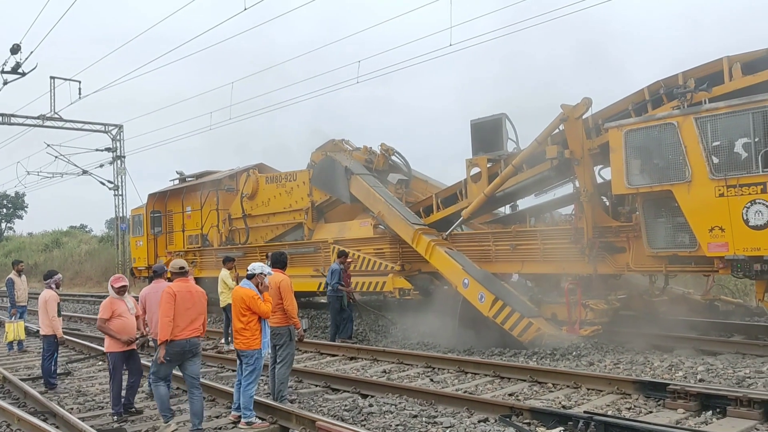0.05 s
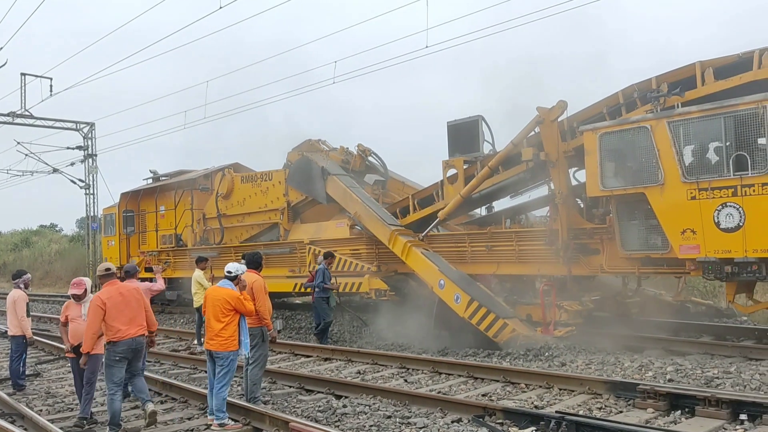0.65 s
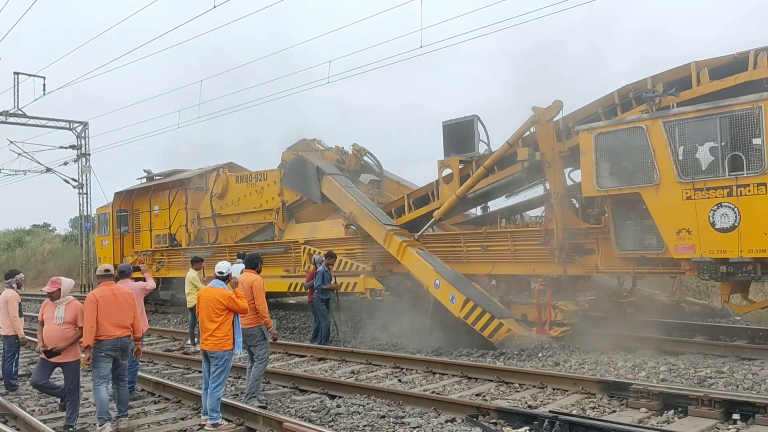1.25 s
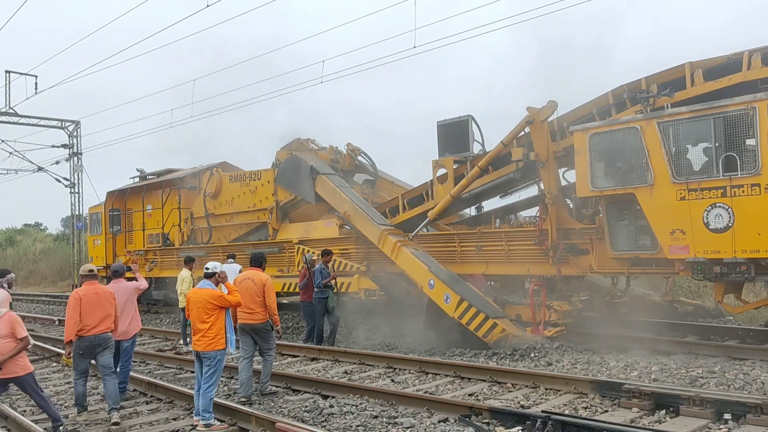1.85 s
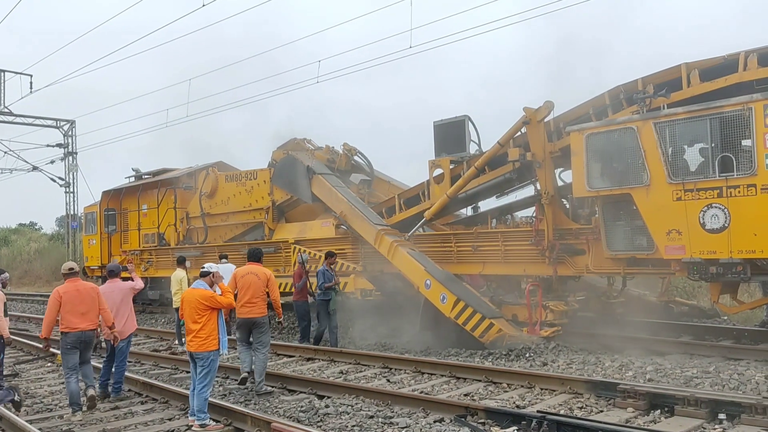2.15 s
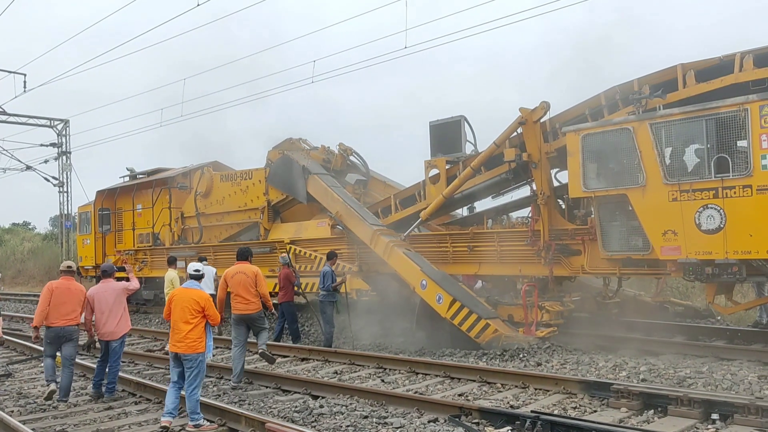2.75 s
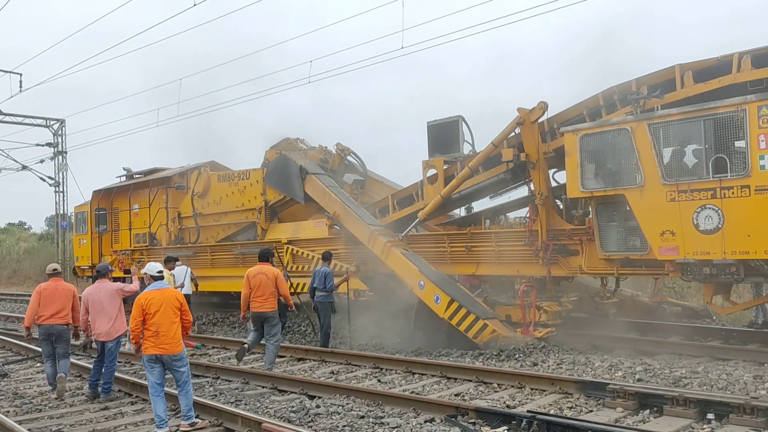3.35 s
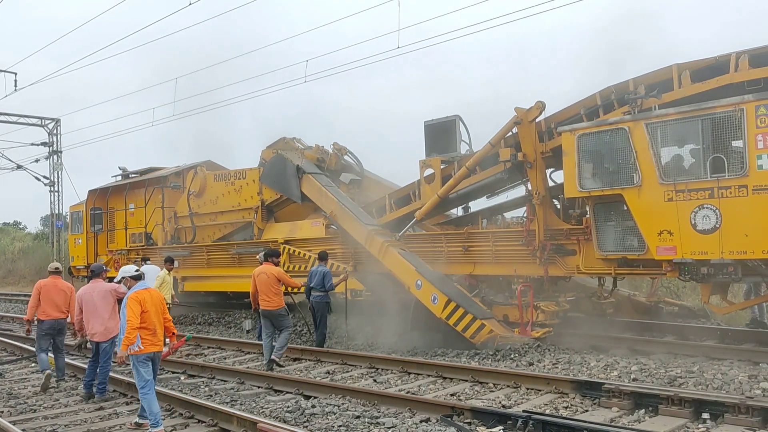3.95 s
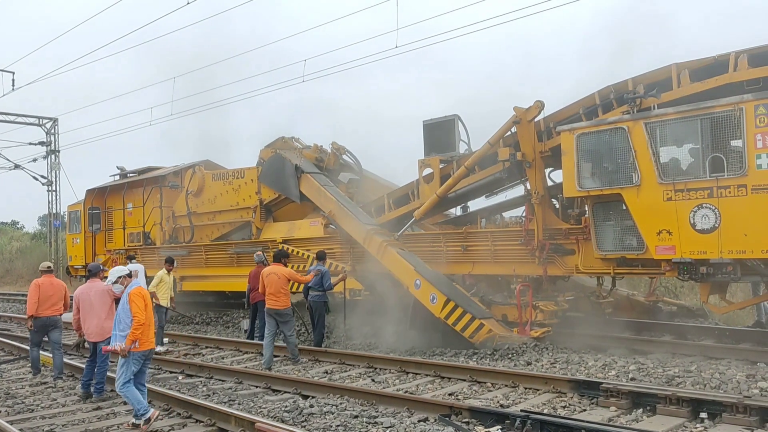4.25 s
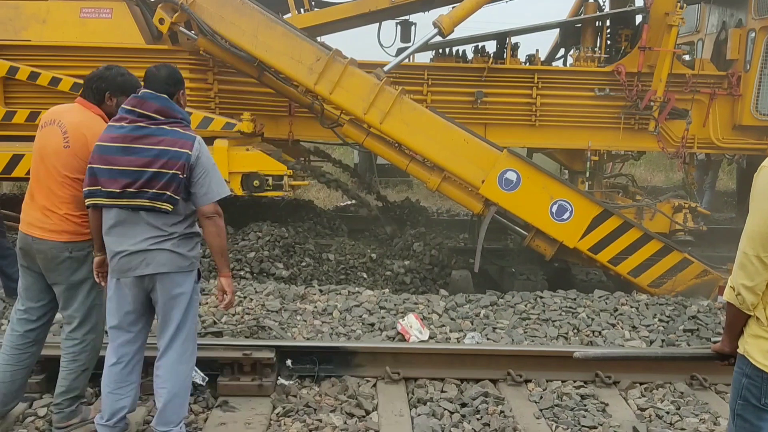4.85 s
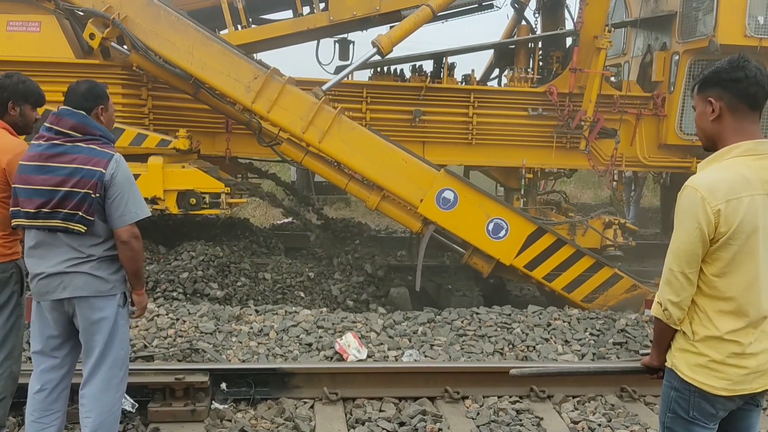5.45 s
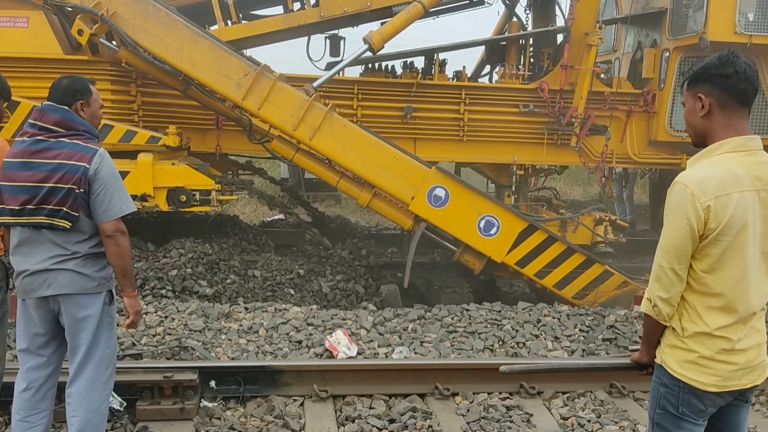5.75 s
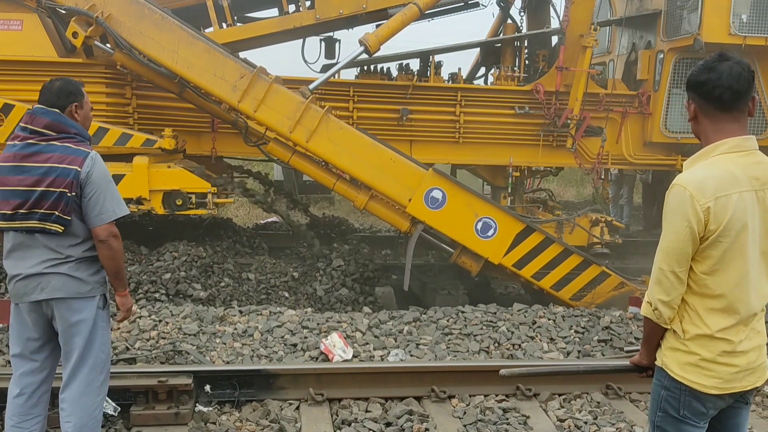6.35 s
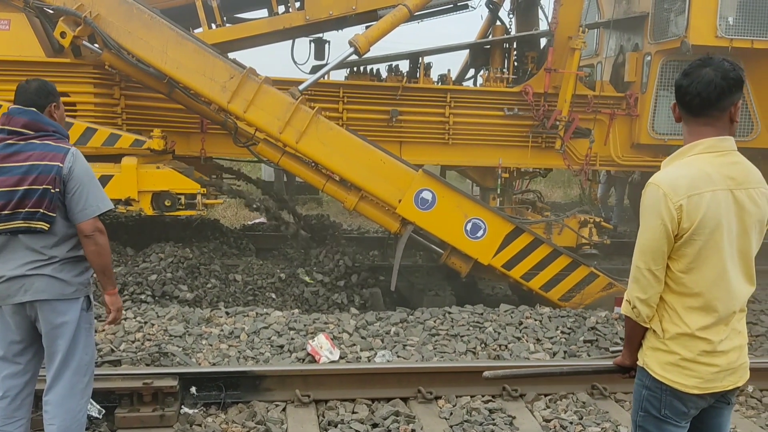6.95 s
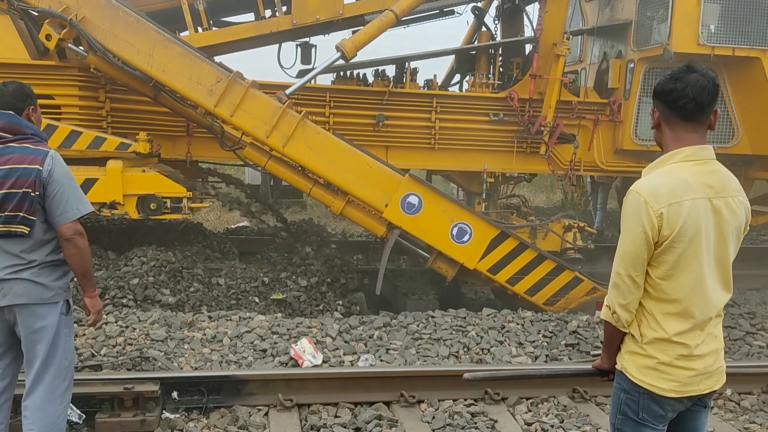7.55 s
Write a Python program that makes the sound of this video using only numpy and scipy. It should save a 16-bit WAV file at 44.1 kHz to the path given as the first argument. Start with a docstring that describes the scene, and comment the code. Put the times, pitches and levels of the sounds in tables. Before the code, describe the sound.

A track maintenance machine roars with stones rattling through steel troughs over a diesel drone, first from a distance, then close up.

```python
"""A torrent of stones rattles through the steel troughs of a ballast cleaning machine on a railway line.
Countless impacts merge into a roar, coloured by the resonances of the steel, while large stones clink,
knock and crunch. Beneath it two diesels drone and a shaking screen thumps, each in harmonics of its cycle.
The machine is heard first from across the tracks; the sound breaks off for a moment, with one tick,
and swells back with a soft thud from close beside the digging chain."""
import sys
import numpy as np
from scipy import signal
from scipy.fft import rfft, irfft
from scipy.io import wavfile
from scipy.ndimage import uniform_filter1d

SR = 44100
rng = np.random.default_rng(int(sys.argv[2]) if len(sys.argv) > 2 else 0)


def inscribe(sig):
    """Save sig as 16-bit PCM at rate SR to the path in sys.argv[1].

    A 1-D sig is mono; a 2-D sig holds one channel per row.
    Samples are clipped to [-1, 1] before scaling.
    """
    pcm = np.round(np.clip(np.atleast_2d(sig).T, -1, 1) * 32767)
    wavfile.write(sys.argv[1], SR, pcm.astype(np.int16))


N = 340011
TIME = np.arange(N) / SR

# Spectrum of stones on steel: (frequency [Hz], left density [dB/Hz], right density [dB/Hz])
FAR_SPECTRUM = [(26, -71, -80), (42, -51.5, -67.5), (55, -52.5, -63), (124, -52.5, -56), (165, -48, -52.5),
                (225, -47, -50), (280, -42.5, -50), (330, -44.5, -52), (387, -47.5, -46.5), (530, -50, -55),
                (780, -48.5, -48), (937, -50.5, -54.5), (1630, -52.5, -54), (1840, -51, -53.5),
                (2200, -55.5, -54.5), (2400, -52.5, -53.5), (3370, -54, -57.5), (5530, -56.5, -56),
                (14400, -64.5, -64)]
NEAR_SPECTRUM = [(26, -63, -72), (40, -44, -62), (55, -46, -61), (119, -49, -56.5), (233, -43, -45),
                 (318, -42.5, -50.5), (400, -47.5, -49), (550, -49, -51.5), (650, -48.5, -48),
                 (764, -45, -47.5), (990, -48, -51), (1680, -50.5, -51.5), (1930, -51, -51.5),
                 (3230, -56.5, -55.5), (5630, -57, -59.5), (14000, -59.5, -54.5)]
# Likeness of the two channels: (frequency [Hz], coherence [0-1], phase lead of the left [rad])
FAR_COHERENCE = [(100, .96, -.1), (300, .94, -.35), (520, .8, -.1), (750, .88, .2), (1000, .62, 0),
                 (1250, .7, .1), (1600, .36, .1), (1900, .45, .3), (2800, .36, 1.9), (4400, .3, 1.1),
                 (6000, .08, 3)]
NEAR_COHERENCE = [(100, .95, 0), (330, .92, 0), (580, .76, .1), (950, .54, 1.2), (1500, .42, 2.3),
                  (2100, .25, 4.1), (3200, .1, 6), (4500, .2, 7.5), (5700, .32, 12), (7000, .25, 12.6),
                  (9000, .12, 15.5)]
# Resonance of the microphone ports: (frequency [Hz], left gain [dB], right gain [dB])
PORT_RESPONSE = [(5500, 0, 0.5), (6260, -0.5, 1.5), (7300, 6.5, 9), (8430, -2.5, 5), (8650, 3.5, -5),
                 (8980, 3, -18), (9470, 1.5, -15), (10180, -27, -1), (11200, -7, -10),
                 (14000, -10.5, -14.5)]
def ballast_roar(spectrum, modes, coherence, flow, cracks, rings,
                 crack_share, ring_share, clump_db, level_db):
    """Source and filter: single stones stand out of the noise of thousands, and the steel colours both."""
    drive = np.sqrt(crack_share) * cracks + np.sqrt(1 - crack_share) * rng.standard_normal((2, N))
    frames = dict(fs=SR, nperseg=1024, noverlap=768)
    hz, t, wash = signal.stft(drive, **frames)
    ringing = signal.stft(rings, **frames)[2]
    ring_band = np.interp(hz, [500, 1100, 9000, 9900], [0, 1, 1, 0])[:, None]
    left, other = np.sqrt(1 - ring_share * ring_band) * wash + np.sqrt(ring_share) * ringing
    alike, lead = over_hz(coherence, hz)[:, :, None]
    right = (alike * left + np.sqrt(1 - alike ** 2) * other) * np.exp(-1j * lead)
    # boom, clatter and spray each surge in their own range
    weights = ([.91, .5, .016, .15], [.33, .66, .52, .45], [.071, 0, .44, .57])
    ranges = np.array([np.interp(hz, [350, 503, 1600, 2600], w) for w in weights])
    swell = ranges.T @ np.array([np.interp(t, TIME, level) for level in flow])
    # each clump of stones has its own pitch, and the top treble flickers
    clump_depth = clump_db * np.interp(hz, [300, 1200, 8000, 10500], [.35, .9, .7, 6])
    clumps = flicker(clump_depth, left.shape, bins=6, frames=5)
    # narrow bands flicker, which makes the rattle coarse
    coarse_depth = 2.1 * np.interp(hz, [500, 1500, 6000, 8000], [0, 1, 1, .5])
    coarse = flicker(coarse_depth, left.shape, bins=2, frames=9)
    colour = over_hz(spectrum, hz) + over_hz(PORT_RESPONSE, hz)
    gain_db = colour[:, :, None] + trough_resonance(modes, hz, t) + swell + clumps + coarse + level_db
    roar = signal.istft(np.array([left, right]) * amp(gain_db), **frames)[1]
    return np.sqrt(SR / 2) * roar[:, :N]


def stone_cracks(per_s, spread_db, t60_s, octaves=.55, sizes=18):
    """Shot noise of collisions: each size of stone cracks in its own band, and big ones ring longer."""
    t = np.arange(2048) / SR
    f = np.fft.rfftfreq(len(t), 1 / SR)
    centres = np.geomspace(500, 11000, sizes)
    bands = octave_bell(f, centres[:, None], octaves) + 1e-6
    bands /= np.sqrt((bands ** 2).sum(0))
    out = np.zeros((2, N))
    for hz, band in zip(centres, bands):
        strength = amp(spread_db * np.minimum(rng.exponential(1, N), 4))
        hits = unit(strength * impulses(per_s / sizes, N))
        decay = amp(-60 * t / (t60_s * np.sqrt(2000 / hz)))  # t60_s holds at 2 kHz
        crack = irfft(rfft(rng.standard_normal((2, len(t)))) * band) * decay
        crack *= np.sqrt(np.mean(band ** 2)) / np.linalg.norm(crack, axis=1, keepdims=True)
        out += signal.oaconvolve(hits[None], crack, axes=1)[:, :N]
    return out


def pebble_rings(per_s=900, spread_db=1.2, nominal_t60_s=.06, span_hz=9000):
    """Damped free vibration: each hard stone rings at its own pitch, with a phase for each channel."""
    t = np.arange(3072) / SR
    out = np.zeros((2, N + len(t)))
    for when, pitch, size, sustain, left, right in rng.random((int(per_s * TIME[-1]), 6)):
        hz = 450 + span_hz * pitch ** 1.5
        weight = amp(spread_db * min(-np.log(1 - size), 2)) * pitch ** .25
        t60 = nominal_t60_s * (.5 + sustain) * (2000 / hz) ** .3
        decay = amp(-60 * t / t60) / np.sqrt(t60)
        phase = 2 * np.pi * (hz * t + np.array([[left], [right]]))
        start = int(when * N)
        out[:, start:start + len(t)] += weight * decay * np.sin(phase)
    return unit(out[:, :N]) * np.sqrt(span_hz / (SR / 2))


# Resonances of the steel troughs and chutes: (frequency [Hz], bandwidth [Hz], mean peak gain [dB])
FAR_TROUGH_MODES = [(734, 120, 1.2), (1160, 260, 3.8), (1915, 200, 3.8), (2430, 280, 2.8), (3020, 220, 3.5),
                    (3580, 160, 2), (4230, 220, 3)]
NEAR_TROUGH_MODES = [(860, 42, 3.6), (1085, 110, 2.6), (1280, 60, 2), (1460, 100, 1.5), (1980, 270, 2.7),
                     (2730, 200, 2.3), (4690, 170, 3.5), (6230, 320, 4.2)]
def trough_resonance(modes, hz, t, shifts_per_s=12):
    """Lorentzian resonances, in dB: each shifts in pitch and strength as stones land in other places."""
    gain = np.zeros((len(hz), len(t)))
    for centre, width, db in modes:
        shift, strength = (np.interp(t, TIME, wander(shifts_per_s)) for _ in range(2))
        detune = hz[:, None] - centre - .4 * width * shift
        gain += db * (1 + .35 * strength) / (1 + (2 * detune / width) ** 2)
    return gain


# The chain tips a load or runs nearly empty: (time [s], duration [s], clatter [dB], spray [dB])
CHAIN_LOADS = [(.25, .1, -2, 0.5), (0.635, 0.1, -1, 2.5), (1.17, 0.24, 1, 0), (1.62, 0.14, -2.5, 1.5),
               (1.84, 0.17, 1, -0.5), (2.06, .05, 0.5, 3), (2.2, 0.4, -2, -0.5), (2.545, 0.11, -3, 1),
               (2.745, 0.058, -1, 0), (2.907, .04, -1.5, 0), (2.967, 0.054, 3, 1.5), (3.07, 0.12, -4.5, 0),
               (3.42, 0.1, -3, -0.2), (3.538, .08, 0, 0), (3.692, 0.081, 2, -5.5), (4.23, 0.076, 2.5, -3),
               (4.407, 0.075, -2.5, -1.5), (4.578, 0.051, 4.5, -4.5), (5.208, 0.065, 1.5, -4),
               (5.74, 0.057, 0, -2.5), (5.92, 0.13, -0.5, 1.5), (6.404, 0.42, -0.5, -1),
               (7.134, 0.17, 0, 2.2)]
def stone_flow(boom_db, clatter_db, spray_db, surges_per_s=2.1):
    """Amplitude modulation: uneven flow varies the troughs' boom, the clatter and the grit spray, in dB."""
    levels = np.array([depth * wander(surges_per_s) for depth in (boom_db, clatter_db, spray_db)])
    for s, length, clatter, spray in CHAIN_LOADS:
        levels[1:] += np.outer([clatter, spray], bump(s, length))
    return levels


# Large stones clinking against steel: (time [s], frequency [Hz], relative level [dB])
STONE_CLINKS = [(0.323, 3620, -23), (0.352, 4050, -23), (0.36, 4740, -27), (0.42, 3620, -28),
                (0.425, 2150, -21), (0.481, 1810, -22.1), (0.68, 3100, -19), (0.757, 3530, -17),
                (0.84, 3620, -19), (1.058, 3190, -19), (1.15, 3360, -25.0), (1.255, 4650, -23),
                (1.264, 2410, -21), (1.521, 2840, -22.4), (1.612, 2240, -21.6), (1.767, 4570, -26.2),
                (1.796, 4650, -19), (1.878, 1810, -19), (1.879, 4570, -20), (1.918, 4050, -23.7),
                (2.059, 2670, -21), (2.261, 4500, -24), (2.399, 2760, -22.7), (2.616, 4480, -25.8),
                (2.654, 4220, -21), (2.661, 2240, -20), (3.242, 2480, -16), (3.843, 3620, -21),
                (3.886, 4220, -24.5), (3.89, 3700, -25.5), (4.308, 3450, -25), (4.311, 4570, -18),
                (4.523, 1980, -25.5), (4.562, 2500, -24), (4.58, 3360, -28), (5.554, 3790, -24),
                (5.583, 2070, -22.7), (5.786, 4390, -26.9), (6.137, 4130, -27.8), (6.694, 2070, -20),
                (6.767, 5000, -22), (7.231, 3010, -26), (7.653, 2150, -23.3)]
# Heavy stones knocking in the chain trough: (time [s], frequency [Hz], relative level [dB])
TROUGH_KNOCKS = [(0.627, 790, -18), (0.66, 790, -23), (1.105, 770, -19), (1.161, 870, -19),
                 (1.334, 830, -23), (1.492, 820, -17), (1.741, 760, -16), (1.873, 830, -16),
                 (1.992, 930, -20.2), (2.558, 860, -20), (2.853, 1070, -20.7), (2.95, 920, -20),
                 (3.939, 780, -19), (4.085, 760, -24), (4.198, 1190, -18), (4.263, 770, -21),
                 (4.352, 760, -24), (4.546, 800, -21), (4.626, 780, -20), (5.156, 830, -20.3),
                 (5.322, 970, -24), (5.412, 846, -21), (5.574, 940, -19.5), (6.166, 830, -21),
                 (6.309, 810, -18), (6.427, 720, -17), (6.555, 780, -24), (6.637, 850, -19.1),
                 (6.898, 910, -17), (6.96, 760, -22), (7.116, 770, -19)]
def stone_strikes(strikes, level_db, width_hz, rise_s, t60_s, channels):
    """Impact excitation: a stone on steel rings a cluster of close modes, width_hz wide at 3 kHz."""
    t = np.arange(4096) / SR
    f = np.fft.rfftfreq(len(t), 1 / SR)
    envelope = (1 - np.exp(-t / rise_s)) * amp(-60 * t / t60_s)
    out = np.zeros((2, N + len(t)))
    for s, hz, db in strikes:
        phases = np.exp(2j * np.pi * rng.random((channels, len(f))))
        width = width_hz * np.sqrt(hz / 3000)
        modes = phases / (1 + (2 * (f - hz) / width) ** 2)
        ring = unit(irfft(modes) * envelope) / unit(envelope).max()
        start = int(s * SR)
        out[:, start:start + len(t)] += amp(db + level_db) * ring
    return out[:, :N]


# Heaps tumbling onto steel: (time [s], decay time [s], centre frequency [Hz], level [dB])
TUMBLING_HEAPS = [(0, .014, 3200, -15), (.177, .014, 5500, -16), (.362, 0.024, 4600, -16.5),
                  (0.424, .035, 2500, -15), (0.673, 0.025, 3800, -21), (.757, 0.029, 3700, -20),
                  (.843, .02, 3700, -21), (1.048, .028, 2600, -19), (1.256, 0.033, 3000, -22),
                  (1.38, 0.038, 3700, -17), (1.539, 0.019, 3400, -13.5), (1.881, .025, 3000, -21),
                  (1.926, .02, 3000, -19), (2.105, 0.022, 2600, -16), (2.146, .02, 4500, -18),
                  (2.26, .02, 3700, -19), (2.316, .02, 2300, -17), (2.425, 0.038, 3100, -20),
                  (2.613, 0.018, 3600, -19), (2.659, .02, 3000, -18), (2.809, 0.026, 2500, -17),
                  (2.964, .025, 2700, -22), (3.134, 0.016, 4500, -20), (3.242, 0.027, 2300, -21),
                  (3.331, 0.033, 3600, -18), (3.608, .03, 5500, -19), (3.886, 0.022, 3500, -18),
                  (3.961, .02, 3300, -17), (4.219, 0.027, 3500, -18), (4.305, .045, 2600, -18),
                  (4.318, .014, 4200, -13.5), (4.525, .022, 2000, -17.5), (4.568, .034, 3000, -15),
                  (5.122, .02, 3000, -17.5), (4.654, 0.028, 4500, -18.5), (5.286, 0.023, 3400, -20),
                  (5.351, .02, 5200, -19), (5.475, .035, 3400, -23), (5.636, 0.022, 5500, -15),
                  (5.788, .025, 3200, -18.5), (6.047, 0.018, 6000, -19), (6.201, 0.018, 4000, -19),
                  (6.595, 0.022, 4300, -23), (6.672, .025, 5800, -19), (6.949, 0.018, 6000, -19),
                  (7.132, 0.021, 4700, -20), (7.207, .03, 3600, -23), (7.472, .022, 5800, -16)]
def crunches(octaves=.6, hits_per_s=750, rise_s=.003, t60_s=.017, stones=4):
    """Superposed impacts: a few stones land together and chatter in a dying volley of dry cracks."""
    t = np.arange(8192) / SR
    f = np.fft.rfftfreq(len(t), 1 / SR)
    ports = amp(over_hz(PORT_RESPONSE, f))
    out = np.zeros((2, N + len(t)))
    for s, decay_s, hz, db in TUMBLING_HEAPS:
        hits = impulses(hits_per_s / stones, (stones, len(t)))
        cracks = rng.standard_normal((2, stones, len(t))) * amp(-60 * t / t60_s)
        chatter = (rfft(hits) * rfft(cracks)).sum(1)
        volley = unit(irfft(chatter * octave_bell(f, hz, octaves) * ports))
        envelope = np.minimum(t / rise_s, 1) * np.exp(-(t / decay_s) ** 2 / 2)
        start = int(s * SR)
        out[:, start:start + len(t)] += amp(db) * volley * envelope
    return out[:, :N]


# Diesel harmonics: (order [multiple of the cycle], far relative level [dB], near relative level [dB])
DIESEL_HARMONICS = [(11, -39.5, -49), (12, -33, -35), (13, -34.5, -37), (14, -36.5, -35), (16, -35.5, -35),
                    (18, -32.5, -30.5), (19, -33.5, -34.5), (20, -35, -31.5)]
# Screen harmonics: (order [multiple of the stroke], far relative level [dB], near relative level [dB])
SCREEN_HARMONICS = [(1, -38.5, -45), (3, -40, -37.5), (4, -47, -46), (5, -42, -37)]
# Beating of the firing tone as two diesels drift in and out of step: (time [s], relative level [dB])
FIRING_BEAT = [(0, 0.5), (.5, -1.5), (.8, -17), (1.02, -7.5), (1.25, -21), (1.52, -1), (1.75, -.5),
               (2.7, 0), (3.02, -1.5), (3.3, -14.5), (4.05, -11), (4.27, -5), (4.6, -0.5), (5.2, 2),
               (5.5, -5), (6.6, -4), (6.8, 5), (7.6, 5.5)]
CYCLE_HZ, STROKE_HZ, PUMP_HZ = 17.32, 16.2, 263.8
FAR, NEAR = 0, 1
def machinery(view, flow, waver, hunting, drone_db, firing_db, pump_db, pipe_db, throb_db):
    """Periodic forcing: diesels, pump and screen radiate tones that drift together as a governor hunts."""
    drift = hunting * wander(1.14)
    boom, clatter, _ = flow
    drone = sum(amp(db[view]) * tone(order * CYCLE_HZ, drift, waver) for order, *db in DIESEL_HARMONICS)
    drone *= amp(drone_db + boom)
    drone += amp(pump_db) * tone(PUMP_HZ, drift, waver / 2)
    drone += amp(pipe_db) * tone(17 * CYCLE_HZ, drift, waver)
    thump = sum(amp(db[view]) * tone(order * STROKE_HZ, drift / 4, .38)
                for order, *db in SCREEN_HARMONICS)
    # a deep engine tone lies close to one of the screen's, and the two throb together
    thump += amp(throb_db) * tone(2.5 * CYCLE_HZ, drift / 4, .2)
    thump *= amp(clatter)
    beat_db = np.interp(TIME, *np.transpose(FIRING_BEAT))
    firing = amp(firing_db + beat_db) * tone(6 * CYCLE_HZ, drift, .048)
    return drone * amp([[1], [-1.1]]) + (thump + firing) * amp([[2.3], [-3.2]])


# Swelling drone tones: (peak time [s], duration [s], frequency [Hz], glide [Hz/s], relative level [dB])
DRONE_MOANS = [(.08, 0.53, 294, 0, -26), (.94, .28, 294.5, 0.5, -21), (3.848, .23, 293.5, -2, -24),
               (5.134, .09, 285, -120, -23), (5.207, .12, 305, 70, -27), (5.27, .11, 346, -0.5, -23),
               (5.338, .08, 236, 1, -24), (5.51, 0.058, 238, -89.5, -21), (5.74, .1, 303, 151, -21),
               (5.841, 0.084, 312, -110, -20.5), (5.912, .11, 264, -0.5, -22),
               (6.165, .16, 228.4, 30, -23.5), (6.253, .1, 297, -110, -20.5), (6.51, 0.091, 309, 29, -27),
               (6.866, 0.16, 209, 0, -23.5), (7.109, 0.061, 324, 101, -20), (7.208, .09, 231.2, -41, -21),
               (7.317, .12, 210, 40, -22), (7.52, 0.11, 310, -90, -24)]
def moans(level_db, slide):
    """Amplitude and frequency modulation: tones of the drone swell and sink, gliding as they pass."""
    drift = slide * wander(4.65)
    sound = sum(amp(db) * bump(s, length) * tone(hz, drift + glide * (TIME - s) / hz, .22)
                for s, length, hz, glide, db in DRONE_MOANS)
    return amp(level_db) * sound * amp([[1], [-1.1]])


def sliding_tone(hz, level_db):
    """Random frequency modulation: close by, a tone of the drone slides up and down and flutters."""
    return amp(level_db) * tone(hz, drift=.06 * wander(3.435), waver=.68) * amp([[1], [-1.1]])


def tick(at_s, level_db, hz, length_s):
    """A very short sine burst has a broad spectrum and is heard as a dry tick."""
    t = TIME - at_s
    gate = (t > 0) & (t < length_s)
    return amp(level_db) * np.sin(2 * np.pi * hz * t) * gate * amp([[1], [-1.5]])


def thud(at_s, level_db, rise_s, fall_s):
    """A smooth one-sided pulse holds mainly low frequencies and is heard as a soft thud."""
    t = np.maximum(TIME - at_s, 0)
    return -amp(level_db) * (1 - np.exp(-(t / rise_s) ** 2)) * np.exp(-(t / fall_s) ** 2)


def tone(hz, drift, waver):
    """Multipath fading: changing air paths blur the level and phase of a turning shaft's partial."""
    phase = 2 * np.pi * (hz * np.cumsum(1 + drift) / SR + rng.random())
    blur = 1 + waver * (wander(7.7) + 1j * wander(2.3))
    return unit((blur * np.exp(1j * phase)).real)


def impulses(per_s, shape):
    """Poisson process: independent impulses of random sign."""
    return rng.choice([-1, 1], shape) * (rng.random(shape) < per_s / SR)


def wander(rate_hz, size=2048):
    """Low-pass noise of rms 1: smooth fluctuation up to about rate_hz."""
    f = np.fft.rfftfreq(size, TIME[-1] / size)
    slow = irfft(rfft(rng.standard_normal(size)) / (1 + (f / rate_hz) ** 4))
    return np.interp(TIME, np.linspace(0, TIME[-1], size), unit(slow))


def flicker(depth_db, shape, bins, frames):
    """Log-normal fluctuation: gain in dB, smooth in frequency and time, that preserves mean power."""
    field = rng.standard_normal(shape[::-1]).T
    for _ in range(2):
        field = uniform_filter1d(uniform_filter1d(field, bins, 0), frames, 1)
    depth = depth_db[:, None]
    return depth * unit(field) - depth ** 2 * np.log(10) / 20


def bump(s, length):
    """Gaussian pulse that peaks at s, with the given full width at half height."""
    return .5 ** np.minimum((2 * (TIME - s) / length) ** 2, 60)


def octave_bell(f, centre, octaves):
    """Gaussian passband on a log-frequency axis."""
    return np.exp(-.5 * (np.log2((f + 1) / centre) / octaves) ** 2)


def over_hz(table, hz):
    """Log-frequency interpolation of a table's columns."""
    f, *columns = np.transpose(table)
    return np.array([np.interp(np.log(hz + 1), np.log(f + 1), c) for c in columns])


def amp(db):
    """Decibels to amplitude ratio."""
    return 10 ** (np.asarray(db) / 20)


def unit(x):
    """Normalisation to rms 1."""
    return x / np.sqrt(np.mean(x ** 2) + 1e-20)


def scene():
    """Superposition of stones and machinery: from afar, then, after a short silence, from close by."""
    break_s, return_s = 4.671, 4.861
    flow = stone_flow(boom_db=.4, clatter_db=.35, spray_db=.55)
    rings = pebble_rings()
    cracks = stone_cracks(per_s=1700, spread_db=1, t60_s=.032)
    far = ballast_roar(FAR_SPECTRUM, FAR_TROUGH_MODES, FAR_COHERENCE, flow, cracks, rings,
                       crack_share=.34, ring_share=.22, clump_db=.9, level_db=-.39)
    far += machinery(FAR, flow, waver=.35, hunting=.0011,
                     drone_db=-1.5, firing_db=-29, pump_db=-31, pipe_db=-31, throb_db=-48.5)

    flow = stone_flow(boom_db=.4, clatter_db=.87, spray_db=-.54)
    rings = pebble_rings()
    cracks = stone_cracks(per_s=1900, spread_db=.5, t60_s=.022)
    near = ballast_roar(NEAR_SPECTRUM, NEAR_TROUGH_MODES, NEAR_COHERENCE, flow, cracks, rings,
                        crack_share=.3, ring_share=.2, clump_db=1, level_db=-1)
    near += machinery(NEAR, flow, waver=1, hunting=.0109,
                      drone_db=-2, firing_db=-42, pump_db=-37.5, pipe_db=-41, throb_db=-43)
    near += sliding_tone(hz=226, level_db=-33.5) + sliding_tone(hz=318, level_db=-32)

    events = stone_strikes(STONE_CLINKS, level_db=-1, width_hz=380, rise_s=.003, t60_s=.11, channels=2)
    events += moans(level_db=-1.5, slide=.0079)
    events += stone_strikes(TROUGH_KNOCKS, level_db=-.5, width_hz=750, rise_s=.006, t60_s=.085,
                            channels=1)
    events += crunches()

    leaving = np.interp(TIME - break_s, [0, .001, .017], [1, .17, 0])
    returning = np.interp(TIME - return_s, [0, .02], [0, 1])
    returning *= amp(np.interp(TIME - return_s, [0, .2], [-14.5, 0]))
    mix = (far + events) * leaving + (near + events) * returning
    mix += tick(at_s=4.8291, level_db=-14.5, hz=4700, length_s=.00031)
    return mix + thud(at_s=return_s + .022, level_db=-27, rise_s=.008, fall_s=.1)


def record(dry):
    """Hard clipping at full scale, then a low-pass band limit."""
    lowpass = signal.firwin(511, 14280, window=("kaiser", 9), fs=SR)
    return signal.oaconvolve(np.clip(dry, -1, 1), lowpass[None], "same")


dry = scene()
out = record(dry)
inscribe(out)
```